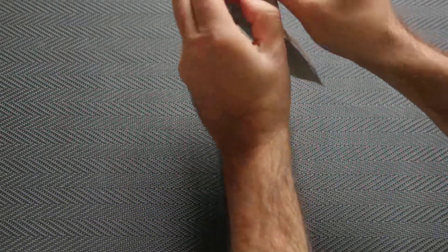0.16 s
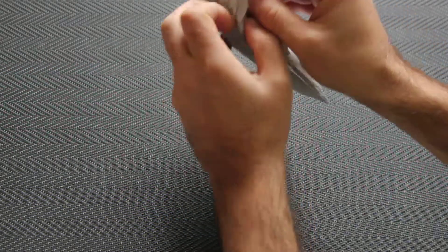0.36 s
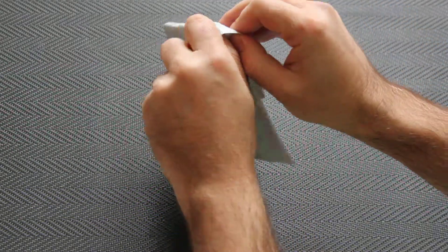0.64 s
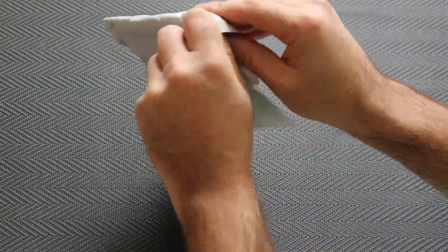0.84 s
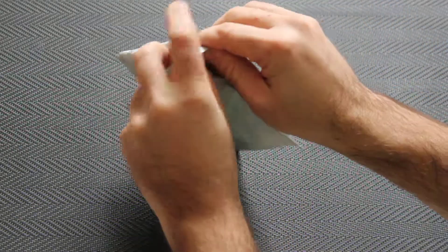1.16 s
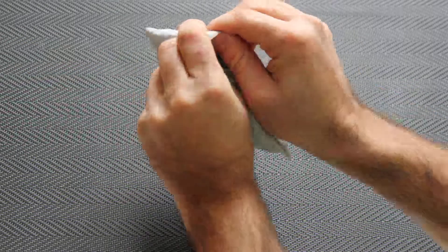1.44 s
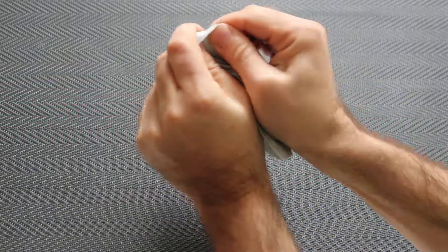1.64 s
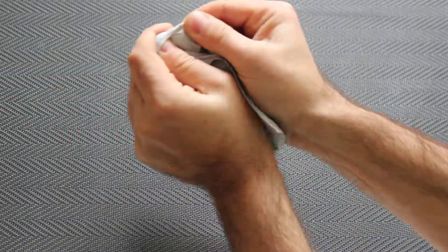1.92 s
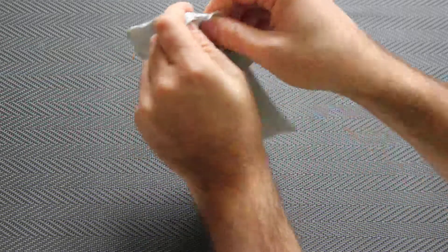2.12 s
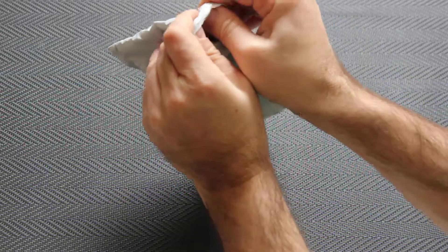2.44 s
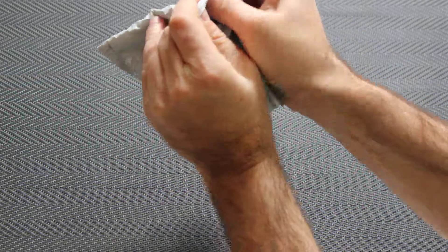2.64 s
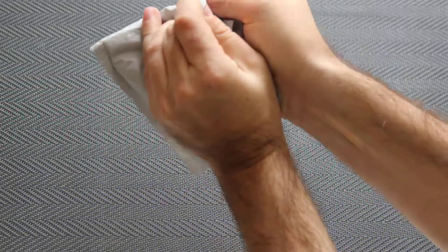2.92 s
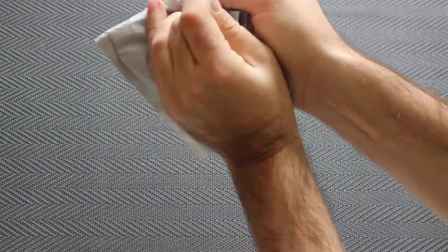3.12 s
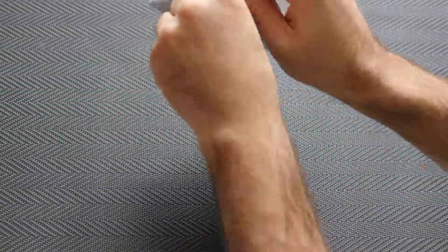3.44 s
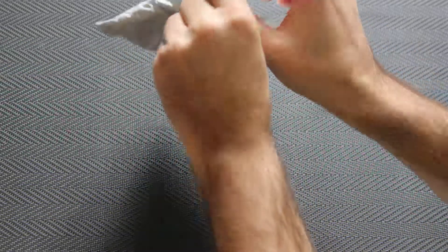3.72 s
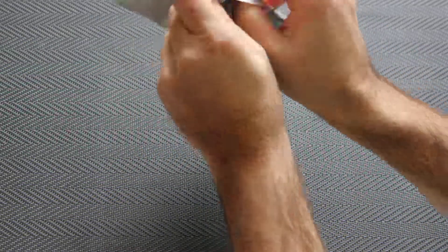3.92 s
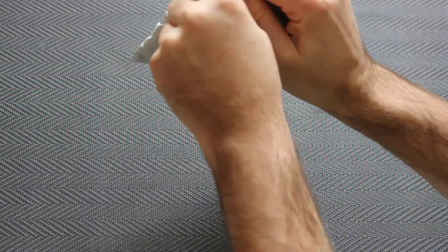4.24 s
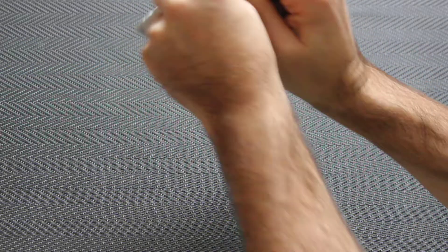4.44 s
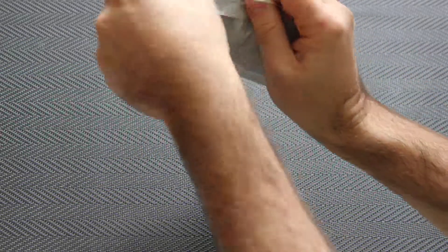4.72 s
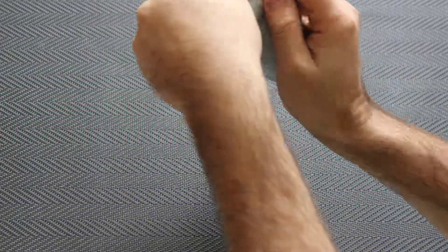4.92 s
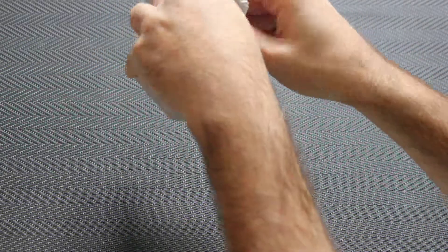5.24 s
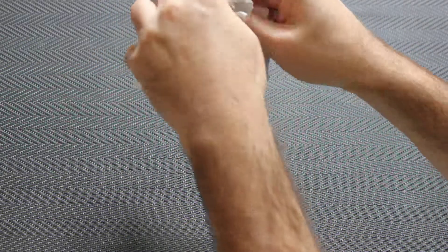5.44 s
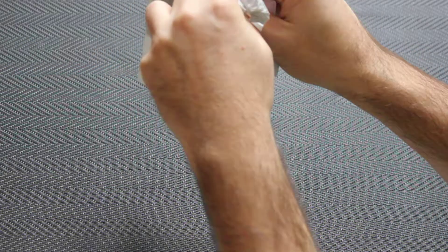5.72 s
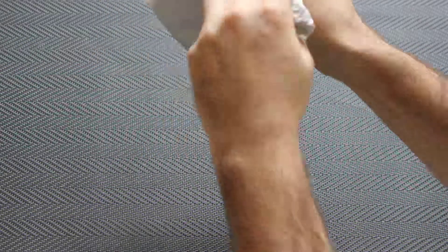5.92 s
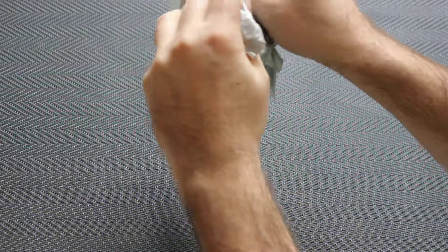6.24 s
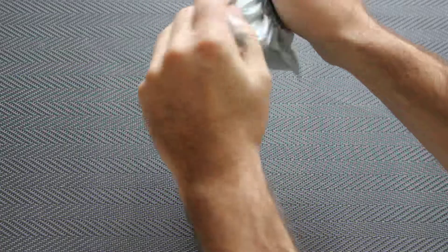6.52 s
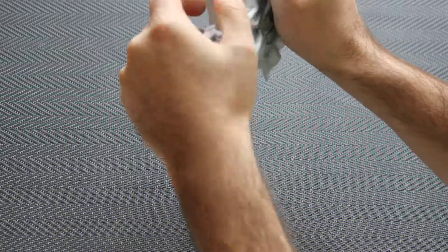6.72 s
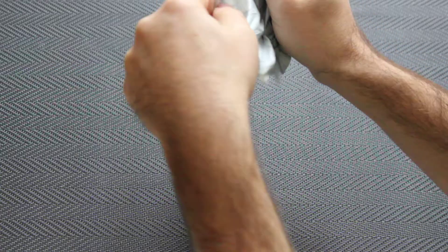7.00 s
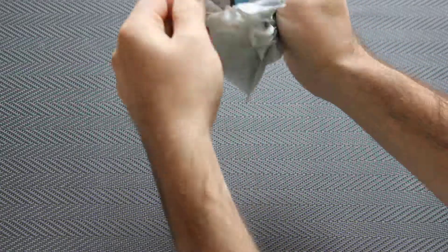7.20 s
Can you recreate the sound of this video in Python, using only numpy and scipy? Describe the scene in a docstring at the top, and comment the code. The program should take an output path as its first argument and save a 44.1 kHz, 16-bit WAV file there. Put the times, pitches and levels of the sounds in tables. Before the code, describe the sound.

A thin plastic pouch is crumpled, stretched and torn by hand close to the microphone in a small furnished room with very little echo. From the start, a dense, bright crackle swells and fades in uneven bursts, full of tiny sharp snaps at different pitches and occasional dull pops from larger folds. A stronger crunch comes at about 0.7 seconds and a loud single snap at 1.7. The crinkling continues, easing a little around 3 seconds, then builds to a loud, sudden ripping crack at 4.4. Lighter crackling leads to a second loud crack near 5.9 seconds. Further crunches follow at about 6.4 and 7.1, and the rustling carries on until roughly 7.4 seconds. A faint, low throbbing rumble comes and goes in the second half, most noticeable around 6.5 seconds, over quiet, steady room hiss.

```python
"""Crumpling a plastic pouch

Two hands crumple, stretch and tear a thin plastic pouch close to a microphone in a small furnished room.
Creases buckle in millisecond snaps, each at its own pitch; a dense random crackle follows the grip,
and large folds give way with dull pops. Reflections add a short tail to each sound.
A low throbbing rumble comes and goes over the room noise."""
import sys
import numpy as np
from scipy import signal
from scipy.fft import rfft, irfft
from scipy.io import wavfile

SR = 44100
rng = np.random.default_rng(int(sys.argv[2]) if len(sys.argv) > 2 else 0)


def master_out(mix):
    """Clip the mix to full scale and print it as 16-bit PCM to the path in sys.argv[1]."""
    frames = np.transpose(np.atleast_2d(mix))
    ceiling = np.clip(frames, -1, 1)
    pcm = np.round(ceiling * 32767).astype(np.int16)
    wavfile.write(sys.argv[1], SR, pcm)


N = 325017

# All levels are relative.
# Creases that buckle audibly: t/s, body peak level/dB, f/Hz, edge peak level/dB
CREASE_SNAPS = [(0.0612, -11, 7150, -16), (0.0795, -15, 3360, -16), (0.2138, -13, 3060, -18),
                (0.2806, -12, 3400, -9), (0.2922, -18, 3100, -22), (0.3345, -15, 3880, -19),
                (0.3927, -9, 5470, -12), (0.4227, -14, 3060, -9), (0.4486, -14, 3600, -19),
                (0.5087, -20, 7540, -2), (0.517, -14, 6930, -13), (0.5615, -12, 5600, -22),
                (0.6949, -15, 7620, -22), (0.7183, -16, 2760, -11), (0.7391, -11, 6590, -14),
                (0.7757, -21, 3140, -14), (0.7913, -12, 5000, -22), (0.9357, -14, 3400, -29),
                (1.0383, -7, 5810, -24), (1.0628, -14, 3660, -28), (1.2382, -23, 3920, -17),
                (1.3871, -13, 6720, -18), (1.3943, -13, 3660, -26), (1.4588, -20, 2800, -15),
                (1.6587, -13, 2970, -30), (1.7192, 1, 2760, -8), (1.7923, -20, 6370, -17),
                (1.8175, -13, 7360, -22), (1.9098, -17, 4260, -44), (2.0715, -23, 8230, -17),
                (2.1823, -22, 5470, -13), (2.2095, -18, 5040, -26), (2.2449, -16, 6160, -16),
                (2.2722, -14, 7320, -17), (2.317, -20, 3000, -22), (2.3981, -18, 7150, -25),
                (2.4431, -16, 5500, -15), (2.6365, -13, 3750, -15), (2.7476, -19, 3500, -24),
                (2.8209, -18, 5560, -23), (2.833, -19, 3000, -23), (2.957, -21, 4500, -30),
                (3.1122, -29, 2070, -18), (3.155, -22, 2900, -34), (3.2027, -15, 6800, -19),
                (3.285, -22, 2200, -34), (3.355, -18, 3300, -23), (3.409, -16, 5380, -14),
                (3.4131, -19, 6720, -15), (3.483, -24, 5600, -33), (3.501, -24, 3200, -23),
                (3.6325, -16, 3050, -32), (3.68, -18, 3620, -19), (3.7221, -19, 5680, -17),
                (3.9224, -12, 3300, -24), (3.9937, -12, 2300, -36), (4.0617, -21, 3140, -18),
                (4.1744, -17, 3660, -18), (4.2866, -16, 4000, -24), (4.4439, 2, 4900, -9),
                (4.4867, -6, 5470, -12), (4.6336, -17, 2500, -30), (4.7205, -19, 4480, -27),
                (4.7991, -15, 4780, -12), (4.9678, -16, 7190, -16), (5.0208, -19, 5500, -21),
                (5.0905, -18, 7240, -21), (5.1193, -17, 6000, -15), (5.2444, -20, 4500, -25),
                (5.257, -18, 6850, -21), (5.2704, -16, 5770, -22), (5.4033, -15, 3270, -20),
                (5.418, -10, 4310, -23), (5.4469, -11, 5470, -19), (5.4602, -10, 5300, -17),
                (5.4856, -8, 6200, -24), (5.6937, -14, 5210, -16), (5.7342, -14, 5000, -24),
                (5.7958, -16, 3270, -26), (5.8535, -6, 2300, -16), (5.8788, -1, 1890, -20),
                (6.0275, -12, 3190, -22), (6.0826, -19, 4820, -17), (6.219, -18, 3400, -15),
                (6.2777, -17, 2150, -13), (6.2928, -10, 4310, -8), (6.3642, -8, 3100, -17),
                (6.4551, -15, 3190, -23), (6.5061, -10, 4000, -27), (7.0318, -15, 6760, -10),
                (7.0394, -16, 3960, -12), (7.112, -14, 4950, -11), (7.1851, -12, 4570, -13),
                (7.3406, -13, 4870, -17)]
# Squeezes, pulls and sudden gives of the film: peak t/s, level/dB, 10 dB rise time/s, 10 dB fall time/s
GRIP_BURSTS = [(0.078, -30.5, .5, .08), (0.215, -33, .1, .07), (0.284, -31, .004, .13),
               (0.396, -31, .004, .3), (0.6, -32, .2, .06), (0.726, -23, .03, .07), (0.847, -31, .02, .05),
               (0.925, -30, .08, .08), (1.0, -32, .005, .05), (1.09, -30, .1, .06), (1.3, -36, .5, .3),
               (1.391, -31, .004, .8), (1.723, -28, .004, .1), (1.82, -30, .04, .13),
               (2.171, -28.5, .05, .03), (2.249, -27, .035, .045), (2.329, -32, .05, .045),
               (2.446, -33, .004, .06), (2.639, -27.5, .06, .09), (2.83, -33, .15, .08),
               (2.955, -35, .02, .05), (3.17, -34, .3, .2), (3.41, -35, .2, .1), (3.513, -35, .04, .08),
               (3.634, -27, .003, .04), (3.685, -31, .02, .05), (3.731, -31, .08, .08),
               (3.925, -29, .004, .03), (3.997, -27, .004, .07), (4.219, -24, .07, .09),
               (4.435, -30, .6, .02), (4.447, -14, .004, .095), (4.8, -31, .01, .4), (4.976, -30, .08, .07),
               (5.121, -33, .006, .08), (5.273, -30.5, .04, .11), (5.407, -31, .004, .06),
               (5.495, -22, .1, .08), (5.739, -31.5, .07, .06), (5.868, -13, .036, .05),
               (6.03, -30, .05, .25), (6.365, -22, .13, .07), (6.515, -30, .08, .14),
               (6.769, -36, .08, .07), (6.907, -35, .04, .08), (7.035, -30, .03, .08),
               (7.128, -23, .06, .09), (7.31, -28, .015, .1)]
# Spectrum of the crackle: f/Hz, spectral density level/dB
FILM_SPECTRUM = [(150, -23.5), (560, 0), (1050, -15), (1300, 7.5), (2000, 4.5), (3200, 6.5), (6000, 2),
                 (9400, -4), (12000, 7), (13700, 11), (16000, 1)]
# Changing colour of the crackle: t/s, treble level/dB, bass level/dB
CRACKLE_COLOUR = [(0.0, -2, -10), (0.45, -5, -14), (0.8, -3, -11), (1.0, -8, -8), (1.15, -2, -13),
                  (1.65, -8, -11), (2.05, -4, -14), (2.87, -6, -13), (3.05, -10, -7), (3.45, -3, -15),
                  (3.94, -6, -10), (4.35, -6, -14), (4.8, -3, -13), (5.2, -5, -15), (5.55, -10, -16),
                  (5.9, -13, -13), (6.15, -1, -11), (6.5, -4, -14), (6.67, 3, -13), (6.8, -5, -11),
                  (7.0, 1, -12), (7.37, -6, -12)]
# Large folds giving way: t/s, peak level/dB, f/Hz
FOLD_POPS = [(0.146, -33, 520), (0.498, -32, 740), (0.602, -30, 700), (0.611, -33, 280), (0.706, -34, 750),
             (0.723, -32, 570), (1.431, -33, 830), (1.798, -31, 850), (2.601, -35, 540), (3.993, -26, 700),
             (4.443, -23, 630), (4.821, -31, 800), (5.485, -31, 580), (5.733, -30, 620), (5.854, -24, 760),
             (5.901, -29, 770), (6.364, -31, 430)]
# Reverberation time of the room: f/Hz, T60/s
ROOM_DECAY = [(300, 0.18), (800, 0.22), (2100, 0.09), (5500, 0.092), (14600, 0.05)]
# Course of the rumble: t/s, deep tone level/dB, upper resonance level/dB
RUMBLE_LEVELS = [(2.9, -86, -75), (3.9, -78, -66), (4.6, -86, -81), (4.7, -64, -72), (4.98, -63, -76),
                 (5.06, -84, -76), (5.49, -80, -80), (6.27, -66.5, -57.5), (6.32, -60, -45),
                 (6.49, -51, -47), (6.77, -64.5, -56.5), (6.95, -55, -57), (7.0, -73, -65.5),
                 (7.23, -62, -56), (7.37, -72, -69)]
# Upper resonances of the rumble: f/Hz, bandwidth/Hz, level/dB
RUMBLE_RESONANCES = [(105, 40, -4.5), (190, 40, -12), (262, 30, -9)]
# Room noise and microphone hiss: f/Hz, spectral density level/dB
NOISE_SPECTRUM = [(20, -16.5), (50, -11), (120, -11), (250, -2.5), (800, -7.5), (2000, -6.5), (6000, -12),
                  (16000, -23.5)]


def snaps(wake_s=.0007, ring_s=.0022, flurry_s=.007):
    """Buckling: a crease rings, struck by a click with a jagged wake; neighbours follow in a flurry."""
    out, t = np.zeros(N), np.arange(1600) / SR
    edge_band = signal.butter(2, [9500, 16000], "band", fs=SR, output="sos")
    noises = rng.standard_normal((len(CREASE_SNAPS), 2, len(t)))
    for (s, body_db, hz, edge_db), (jag, rough) in zip(CREASE_SNAPS, noises):
        click = (t == 0) + .2 * jag * np.exp(-t / wake_s)
        flurry = .025 * jag * rough ** 2 * np.exp(-t / flurry_s)
        ringing = rms_one(ring(click + flurry, hz, hz * ring_s))
        body_band = signal.butter(1, [hz / 4, 9000], "band", fs=SR, output="sos")
        body = signal.sosfilt(body_band, ringing + .55 * rms_one(click))
        edge = signal.sosfilt(edge_band, click + flurry)
        add(out, s, from_db(body_db) * body / abs(body).max() + from_db(edge_db) * edge / abs(edge).max())
    return out


def crackle(base_per_s=9000, spread_db=4.4, cycles=4, clump_db=4, patchy_db=2.5):
    """Shot noise: tiny creases buckle at random, in clumps, each ringing at a pitch set by its size."""
    level_db = grip()
    treble_db, bass_db = (curve - curve.mean() for curve in in_time(CRACKLE_COLOUR))
    strengths = from_db(spread_db * np.minimum(rng.exponential(1, N), 4.5)) * rng.choice([-1, 1], N)
    density = from_db(.6 * (level_db - level_db.mean()))  # a harder grip buckles more creases at once
    buckles = rng.random(N) < base_per_s * density * from_db(clump_db * drift(30)) / SR
    clicks = buckles * strengths / np.sqrt(density)
    size_class = (20 * rng.random(N) ** .45).astype(int)  # small creases outnumber large ones
    out = np.zeros(N)
    for k, hz in enumerate(np.geomspace(180, 15500, 20)):
        coarse = hz < 7500
        struck = size_class == (k if coarse else 19)  # the finest creases tick across the whole treble
        grains = (-1) ** k * rms_one(ring(clicks * struck, hz, cycles))
        treble_share = np.clip(np.log2(hz / 5500) / .3, 0, 1)
        bass_share = np.clip(np.log2(1800 / hz) / .4, 0, 1)
        colour_db = at_hz(FILM_SPECTRUM, hz) + treble_share * treble_db + bass_share * bass_db
        wander_db = patchy_db * coarse * drift(9)  # each coarser size comes and goes on its own
        out += grains * np.sqrt(hz) * from_db(colour_db + wander_db)
    return from_db(level_db) * rms_one(out)


def grip(resting_db=-50):
    """Incoherent addition: exponential bursts and the film merely held sum in power to a level in dB."""
    t = np.arange(0, N + 40, 40) / SR
    bursts = sum(from_db(db - 10 * np.maximum((s - t) / rise_s, (t - s) / fall_s)) ** 2
                 for s, db, rise_s, fall_s in GRIP_BURSTS)
    power = from_db(resting_db) ** 2 + bursts
    return np.interp(np.arange(N) / SR, t, 10 * np.log10(power))


def pops(push_s=.004, cycles=4.5):
    """Damped vibration: the soft push of a yielding fold rings a large panel of the pouch briefly."""
    out, t = np.zeros(N), np.arange(3000) / SR
    for s, db, hz in FOLD_POPS:
        push = (t == 0) + .2 * rng.standard_normal(len(t)) * np.exp(-t / push_s)
        panel = ring(ring(push, hz, cycles), hz, cycles)
        add(out, s, from_db(db) * panel / abs(panel).max())
    return out


def room(x, gap_s=.0013, places=10, dwell_s=.06):
    """Reverberation: each band of reflections dies at its own rate; paths change as the hands move."""
    t, edges_hz = np.arange(SR // 3) / SR, 100 * 2 ** np.arange(0, 7.6, .5)
    white, tails = rng.standard_normal((2, places, len(t))), 0
    for k, (low, high) in enumerate(zip(edges_hz, edges_hz[1:])):
        band = signal.sosfilt(signal.butter(2, [low, high], "band", fs=SR, output="sos"), white[k % 2])
        tails += band * from_db(-60 * t / at_hz(ROOM_DECAY, np.sqrt(low * high)))
    tails *= np.clip(t / gap_s - .5, 0, 1)
    place = np.arange(N) / SR / dwell_s % places
    out = 0
    for k, tail in enumerate(tails):
        apart = np.abs((place - k + places / 2) % places - places / 2)
        share = np.cos(np.pi / 2 * np.minimum(apart, 1))  # one place fades into the next
        out += signal.oaconvolve(x * share, tail / np.sqrt(np.sum(tail ** 2)))[:N]
    return out


def rumble(deep_hz=56, wobble_hz=3.1, throb_db=3.5, throb_hz=5.1):
    """Random modulation: a deep wavering tone and resonant bands of noise above it throb in level."""
    deep_db, upper_db = in_time(RUMBLE_LEVELS)
    pitch_hz = deep_hz + wobble_hz * drift(1.8)
    tone = np.sqrt(2) * np.sin(2 * np.pi * np.cumsum(pitch_hz) / SR)
    upper = 0
    for hz, width_hz, db in RUMBLE_RESONANCES:
        cycles = np.log(1000) / np.pi * hz / width_hz
        hum = ring(ring(rng.standard_normal(N), hz, cycles), hz, cycles=1.3)
        upper += rms_one(hum) * from_db(db + throb_db * drift(throb_hz))
    deep = from_db(deep_db + throb_db * drift(throb_hz)) * tone
    fade_in = np.clip((np.arange(N) / SR - RUMBLE_LEVELS[0][0]) / .05, 0, 1)
    return fade_in * (deep + from_db(upper_db) * rms_one(upper))


def room_noise():
    """Stationary noise: room noise and microphone hiss have a steady spectrum."""
    hz = np.maximum(np.fft.rfftfreq(N, 1 / SR), 1)
    spectrum = rfft(rng.standard_normal(N)) * from_db(at_hz(NOISE_SPECTRUM, hz))
    return rms_one(irfft(spectrum, N))


def ring(drive, hz, cycles):
    """Damped resonance: the response falls by 60 dB in the given number of cycles."""
    r, w = from_db(-60 * hz / (cycles * SR)), 2 * np.pi * hz / SR
    return signal.lfilter([1, 0, -1], [1, -2 * r * np.cos(w), r * r], drive + 1e-18)


def drift(corner_hz):
    """Low-pass noise: a slow fluctuation of unit RMS."""
    r = np.exp(-2 * np.pi * corner_hz * 40 / SR)  # one step per 40 samples
    slow = signal.lfilter([1], [1, -2 * r, r * r], rng.standard_normal(N // 40 + 2002))[2000:]
    return np.interp(np.arange(N) / 40, np.arange(len(slow)), rms_one(slow))


def from_db(db):
    """Amplitude ratio of a level."""
    return 10 ** (np.asarray(db) / 20)


def rms_one(x):
    """Normalisation to unit RMS."""
    return x / np.sqrt(np.mean(x ** 2) + 1e-20)


def in_time(rows):
    """Linear interpolation of each column, one value a sample."""
    s, *columns = np.transpose(rows)
    return [np.interp(np.arange(N) / SR, s, c) for c in columns]


def at_hz(points, hz):
    """Interpolation along log frequency."""
    frequencies, values = np.transpose(points)
    return np.interp(np.log(hz), np.log(frequencies), values)


def add(out, s, sound):
    """Superposition of a short sound at time s."""
    i = round(s * SR)
    out[i:i + len(sound)] += sound[:N - i]


def scene():
    """Superposition: direct sound and reverberation of the pouch lie over the low background."""
    rustle = from_db(-4.2) * crackle() + pops()
    cracks = snaps()
    echoes = room(rustle + from_db(-5.5) * cracks)  # a snap is directional and excites the room less
    return (rustle + cracks + from_db(-6.5) * echoes + rumble() + from_db(-53.5) * room_noise())[None]


def record(dry, stopband_hz=16500):
    """Clipping and band limiting: the loudest snaps reach full scale, and the highest treble is cut."""
    clipped = np.clip(from_db(1.5) * dry, -1, 1)
    return signal.sosfilt(signal.cheby2(16, 70, stopband_hz, fs=SR, output="sos"), clipped)


dry = scene()
out = record(dry)
master_out(out)
```